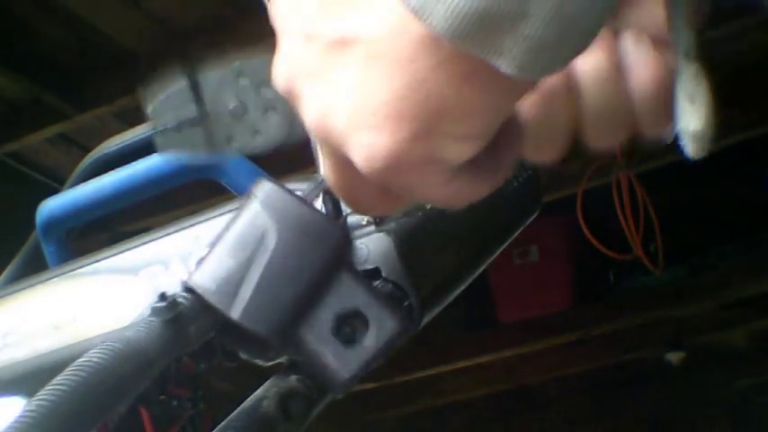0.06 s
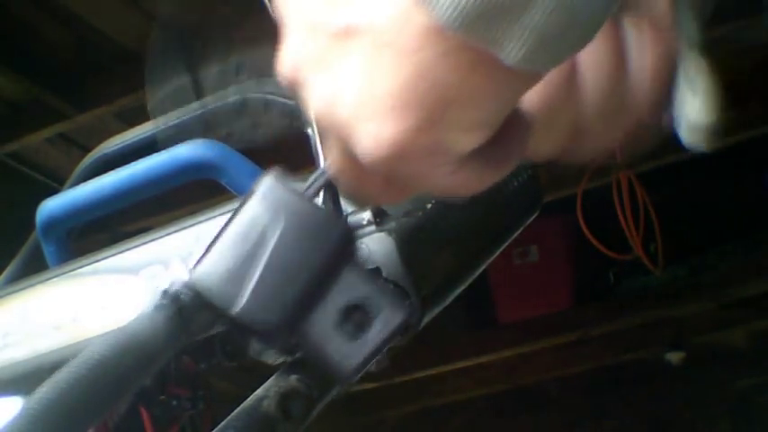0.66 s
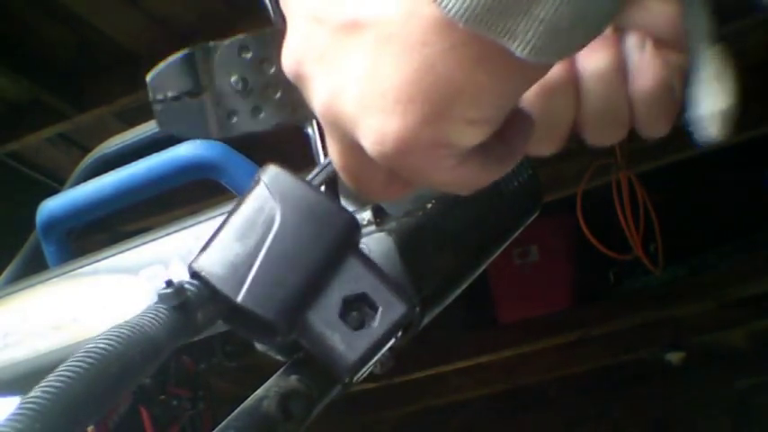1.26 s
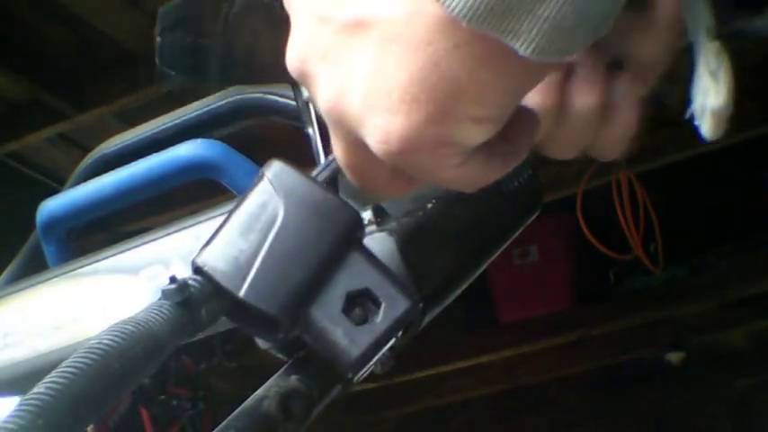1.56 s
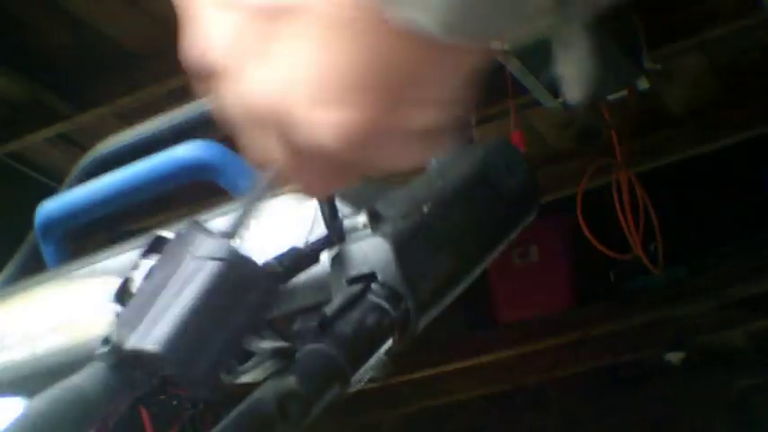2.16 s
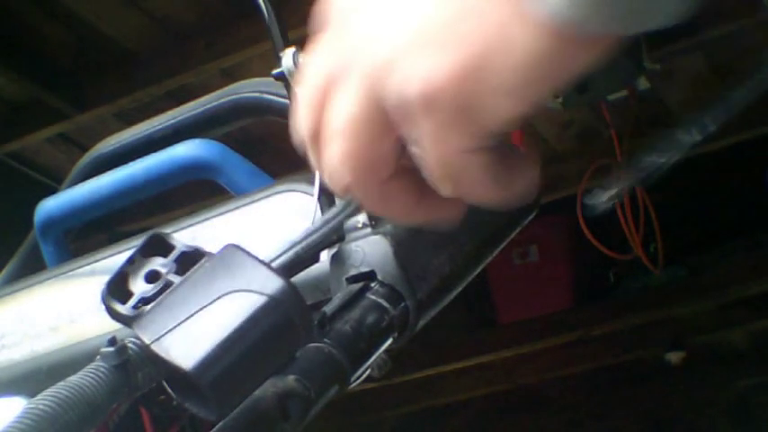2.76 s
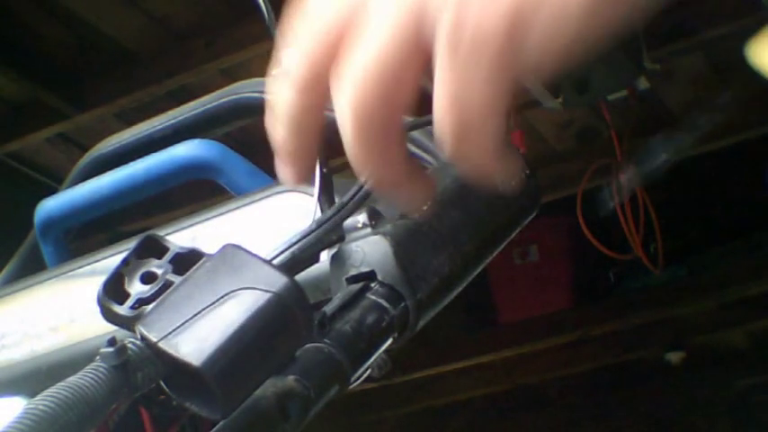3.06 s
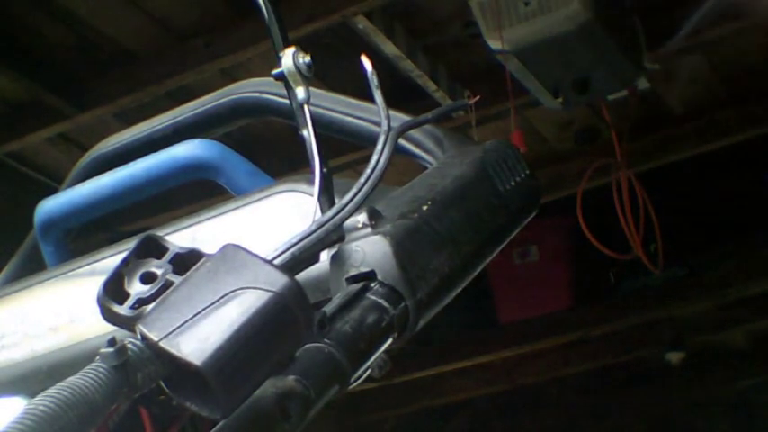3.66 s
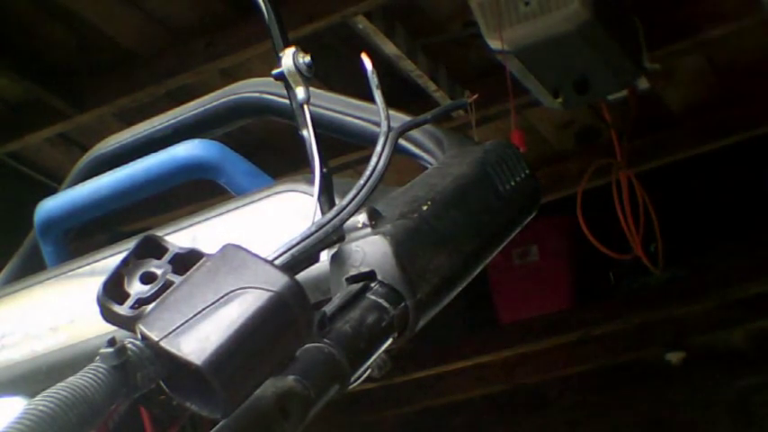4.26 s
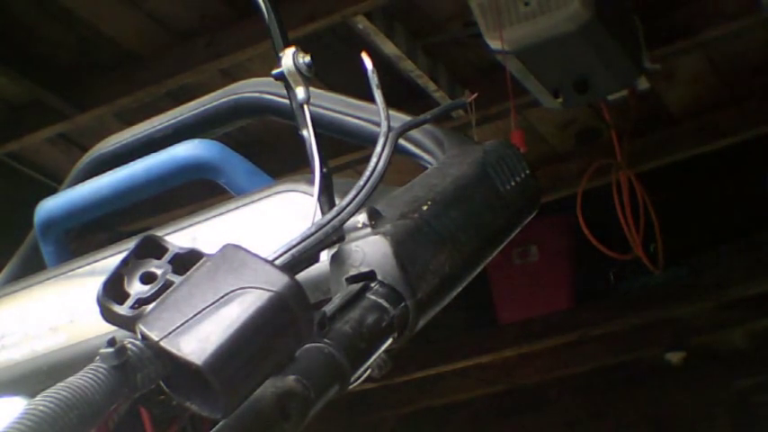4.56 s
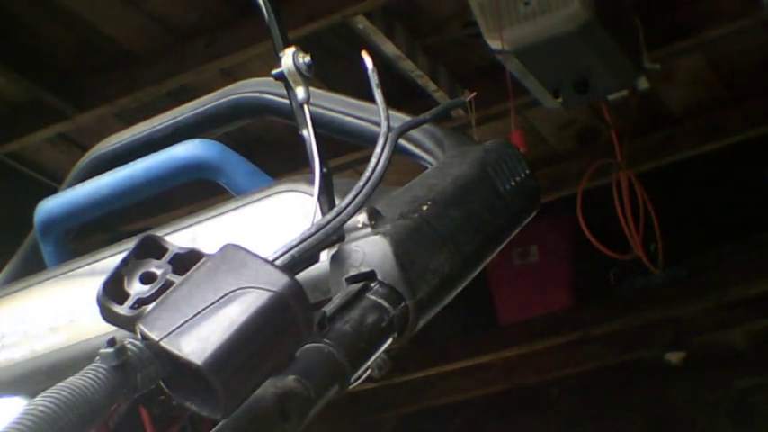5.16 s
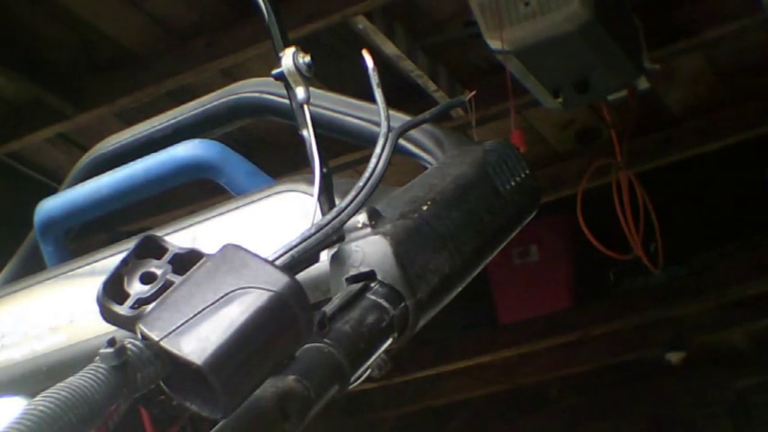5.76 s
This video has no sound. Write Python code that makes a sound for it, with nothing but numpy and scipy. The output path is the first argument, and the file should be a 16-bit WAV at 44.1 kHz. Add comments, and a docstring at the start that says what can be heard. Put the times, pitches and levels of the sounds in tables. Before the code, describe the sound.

Over a faint motor hum, a short metallic clunk and rattle on a handlebar, light rustling, then a tool set down with a thud.

```python
"""A garage, close on a machine's steel handlebar during wiring work. A crimping tool lets go with a clank,
the switch housing rattles against the tube and a loose steel part bounces twice. Fingers tick on wires,
bar and wires faintly creak, squeak and scrape, and a sleeve rustles. The tool goes down on the bench with
a clatter and a thud; a small soft knock comes last. Underneath sit low room air and a far motor's hum,
all through a small camera's dull, faintly ticking microphone."""
import sys
import numpy as np
from scipy import signal
from scipy.fft import rfft, irfft
from scipy.io import wavfile
from scipy.ndimage import uniform_filter1d

SR = 44100
rng = np.random.default_rng(int(sys.argv[2]) if len(sys.argv) > 2 else 0)


def waveform_to_disk(signal):
    """Save audio, clipped to [-1, 1], as 16-bit WAV at the path in sys.argv[1]."""
    frames = np.transpose(np.atleast_2d(signal))
    scaled = np.clip(frames, -1, 1) * 32767
    samples = np.round(scaled).astype(np.int16)
    wavfile.write(sys.argv[1], SR, samples)


N = 265129
T = np.arange(N) / SR

# clanks on the handlebar, knocks of the tool on the bench: (time [s], level [dB], hardness [0-1])
BAR_HITS = [(1.730, -40.5, 1), (1.742, -25.5, 0.24), (1.771, -14.5, 0.97), (1.798, -19, .3),
            (1.819, -21, 0.5), (1.886, -19, 0.8), (1.893, -18, 0.27), (2.030, -33.5, 0.08),
            (2.080, -36.5, 0.48), (2.110, -36, 0)]
BENCH_HITS = [(4.852, -26.5, 0.94), (4.927, -28, 0.81), (4.955, -35, .15), (4.988, -29, 1),
              (5.015, -29.5, 0), (5.086, -19, 0), (5.103, -21.5, 0.63), (5.164, -27, 0.5),
              (5.186, -24.5, 0.91), (5.212, -32, 0), (5.234, -29.5, 0.91), (5.259, -35.5, 0.6)]
# the clear ringing modes of each body: (frequency [Hz], relative level [dB], t60 [s])
BAR_MODES = [(129.5, -6.5, 0.46), (144.5, -10.5, 0.66), (183, 1.5, 0.11), (218.6, 1.5, 0.23),
             (263.8, -9, 0.83), (392.6, -1.5, 0.4), (482, -28.5, 4.4), (495, -7.5, 0.073),
             (517, -25.5, 2.57), (656, -7.5, 0.59), (787, -4, 0.28), (838, 6.5, 0.074), (1000, -21, 0.43),
             (1224, -19, 0.2), (1730, -6, 0.14), (1836, -23, 1.5), (1940, -16, 0.21), (2270, -10.5, .16),
             (2930, -30, 0.19), (3350, -36, 0.4), (3350, -21, 0.32)]
BENCH_MODES = [(188.2, -7.5, 0.25), (229, -1.5, 0.13), (304.8, -2, 0.22), (341, 1, 0.14),
               (456.5, -1.5, 0.15), (507, -8.5, 0.18), (600, -3, 0.089), (687, -12, 0.065),
               (1083, -12.5, 0.15), (1524, -24, 0.15), (1980, -18, 0.11), (2420, -16, 0.052),
               (3365, -22.5, 0.074)]
# colour of each body's dense modes and rattle: (frequency [Hz], relative level [dB])
BAR_RATTLE = [(60, -51), (120, -4), (250, -1.5), (330, -2), (600, -2), (880, -3), (1100, -12), (2300, -14),
              (3400, -23), (4200, -39.5), (5200, -38.5), (7500, -34.5)]
BENCH_RATTLE = [(100, -29), (190, 6), (330, -1), (400, 0.5), (540, 0.5), (760, -4.5), (1080, -9),
                (1600, -18.5), (2500, -25.5), (3400, -30), (4200, -45), (5200, -52.5), (7000, -48)]
# colour of the steel contact's snap on each body: (frequency [Hz], relative level [dB])
BAR_SNAP = [(500, -27), (900, 0.5), (1500, 1.5), (2000, -1), (2350, 0), (2800, -3.5), (3400, -9.5),
            (4200, -25), (5200, -31.5), (7000, -23)]
BENCH_SNAP = [(500, 11.5), (750, -17), (1050, -9), (1600, -27), (2000, 4.5), (2250, 1.5), (2550, 6),
              (2950, -17.5), (3450, -12), (4000, -33), (5200, -34), (6800, -26.5)]
# a harder contact is quicker, brighter, snappier and rattles less: (softest, hardest)
# for rise_s [s], tilt_db_per_octave [dB/octave], snap_db [dB] and rattle_t60 [s]
BAR_CONTACT = dict(rise_s=(0.0028, .0016), tilt_db_per_octave=(-4.5, 2), snap_db=(-16.5, -1),
               rattle_t60=(0.35, 0.14))
BENCH_CONTACT = dict(rise_s=(0.0024, 0.0017), tilt_db_per_octave=(0.93, 0.96), snap_db=(-25.5, 2),
                 rattle_t60=(0.21, 0.15))
# the surface giving under a hit: (time [s], frequency [Hz], level [dB])
THUDS = [(1.904, 253, -16), (4.854, 553, -22.5), (5.085, 274, -7)]
# bounces of the loose steel part: (time [s], level [dB])
CLINKS = [(2.02, -37.5), (2.080, -37)]
# its bright ring: (frequency [Hz], relative level [dB], t60 [s])
CLINK_MODES = [(1760, 2, 0.071), (2490, -7, 0.077), (2800, -17, .05), (3430, -6, 0.048), (3990, -9, 0.033)]
# finger ticks on wires and fittings, and one tick of the tool being handled: (time [s], frequency [Hz], level
# [dB], t60 [s])
TOUCHES = [(2.838, 1797, -59, 0.064), (2.888, 574, -39, 0.036), (3.392, 4530, -67, .04),
           (4.060, 453, -43, 0.049), (4.087, 2200, -44, .03)]
# sleeve swishes and a small soft knock at the end:
# (peak time [s], half length [s], level [dB], tilt [dB/octave])
SOFT_BURSTS = [(3.732, 0.049, -57, -1.5), (4.072, 0.0078, -47, -3.5), (4.092, 0.01, -53.5, 3),
               (4.609, 0.084, -59, 0), (5.998, 0.005, -52.5, -0.5)]
# their colour: (frequency [Hz], relative level [dB])
BURST_COLOUR = [(150, -8.5), (400, 1), (1000, -0.5), (1600, -5.5), (2600, -8), (3600, -17.5), (5000, -29.5),
                (7300, -21)]
# faint creaks, squeaks and scrapes from handlebar and wires: (peak time [s], frequency [Hz], level [dB])
CREAKS = [(.48, 3330, -75.5), (3.04, 2880, -74), (3.57, 3270, -74), (3.72, 1060, -62), (3.78, 2040, -67)]
# the far motor's shaft: (time [s], speed [turns/s])
MOTOR_SPEED = [(0, 42.8), (1.1, 44.5), (4.4, 44.3), (5.4, 42.4), (6, 42.8)]
# swell of its main tone, the third harmonic: (time [s], level [dB])
HUM_LEVEL = [(0, -50.5), (.6, -54.5), (3.5, -57), (3.9, -51.5), (4.35, -57), (4.7, -43.5), (5.0, -53),
             (5.7, -47), (6, -50.5)]
# colour of the room air: (frequency [Hz], relative level [dB])
AIR_COLOUR = [(20, 1), (31, -5), (41, -1), (66, -8.5), (90, -5.5), (135, -10.5), (170, -15), (240, -20),
              (520, -27.5), (880, -26.5), (1100, -35.5), (2100, -37), (3300, -44), (4100, -58),
              (5200, -62.5), (7400, -54)]


def struck_body(hits, modes, rattle_colour, snap_colour, contact, ring_db, rattle_db, snap_t60):
    """Each hit snaps at the steel contact, then rings the body's clear modes and a dense rattle."""
    out, t = np.zeros(N), T[:2 ** 16]
    hz, db, t60 = np.transpose(modes)
    for start, level_db, hardness in hits:
        hit = {name: np.interp(hardness, (0, 1), ends) for name, ends in contact.items()}
        tilt = hit["tilt_db_per_octave"]
        # the point of contact sets each mode's sign and loads it slightly out of tune
        weights = undb(db + tilt * np.log2(hz)) * rng.choice([-1, 1], len(hz))
        detuned_hz = hz + rng.standard_normal(len(hz)) * 1.09 / t60
        partials = np.sin(2 * np.pi * detuned_hz[:, None] * t) * fade(t, t60[:, None])
        ring = undb(ring_db) * (weights @ partials) / np.linalg.norm(weights)
        rattle = undb(rattle_db) * noise(rattle_colour, len(t), tilt) * fade(t, hit["rattle_t60"])
        snap = undb(hit["snap_db"]) * noise(snap_colour, len(t)) * fade(t, snap_t60)
        add(out, start, undb(level_db) * attack(t, hit["rise_s"]) * (ring + rattle + snap))
    return out


def thuds(swell_s):
    """Weight lands behind a hit: a few heavily damped swings of the surface."""
    out, t = np.zeros(N), T[:2 ** 13]
    push = (t / swell_s) ** 2 * np.exp(2 - 2 * t / swell_s)
    for start, hz, level_db in THUDS:
        add(out, start, undb(level_db) * push * np.sin(2 * np.pi * hz * t))
    return out


def clinks(rise_s, snap_db):
    """A small steel part chatters on each bounce and rings its few high modes."""
    out, t = np.zeros(N), T[:2 ** 13]
    for start, level_db in CLINKS:
        ring = sum(undb(db) * np.sin(2 * np.pi * (hz * t + rng.random())) * fade(t, t60)
                   for hz, db, t60 in CLINK_MODES)
        snap = undb(snap_db) * noise(BAR_SNAP, len(t), tilt=2.3) * fade(t, t60=0.041)
        add(out, start, undb(level_db) * (ring + snap) * attack(t, rise_s))
    return out


def touches(width):
    """Fingers flick a wire or a fitting, or the tool is handled: one dull tick each."""
    out, t = np.zeros(N), T[:2 ** 13]
    for start, hz, level_db, t60 in TOUCHES:
        envelope = attack(t, rise_s=0.00096) * fade(t, t60)
        add(out, start, undb(level_db) * envelope * resonant_noise(hz, width, len(t)))
    return out


def handling(grain_db, creak_width_hz, creak_half_s):
    """Grainy swells of noise: sleeve swishes, a soft knock, and creaks from handlebar and wires."""
    out, t = np.zeros(N), T[:2 ** 15]
    middle = t[-1] / 2
    swell = lambda half_s: np.exp(-0.5 * ((t - middle) / half_s) ** 2)
    for peak, half_s, level_db, tilt in SOFT_BURSTS:
        burst = noise(BURST_COLOUR, len(t), tilt)
        add(out, peak - middle, undb(level_db) * swell(half_s) * burst)
    for peak, hz, level_db in CREAKS:
        creak = resonant_noise(hz, creak_width_hz / hz, len(t))
        add(out, peak - middle, undb(level_db) * swell(creak_half_s) * creak)
    return out * undb(grain_db * drift(250))


def garage(x, t60, wet_db, crossover_hz, treble_life):
    """A cluttered wooden room: a diffuse tail whose treble dies first."""
    t = T[:SR]
    wash = rng.standard_normal(len(t))
    lows = butterworth(wash, "low", crossover_hz, order=1)
    tail = lows * fade(t, t60) + (wash - lows) * fade(t, t60 * treble_life)
    tail *= attack(t, rise_s=0.0048)
    return x + undb(wet_db) * signal.fftconvolve(x, tail / np.linalg.norm(tail))[:N]


def motor_hum(waver_db, second_db):
    """A far motor: the third harmonic of its shaft wavers over a weaker second."""
    speed = np.interp(T, *np.transpose(MOTOR_SPEED)) * (1 + 0.007 * drift(11))
    angle = 2 * np.pi * np.cumsum(speed) / SR
    third = undb(np.interp(T, *np.transpose(HUM_LEVEL)) + waver_db * drift(12)) * np.sin(3 * angle)
    second = undb(second_db + waver_db * drift(6)) * np.sin(2 * angle)
    return np.sqrt(2) * (third + second)


def room_air(level_db, waver_db):
    """A bed of dark noise whose level breathes gently."""
    return noise(AIR_COLOUR, N) * undb(level_db + waver_db * drift(5.676))


def noise(colour, size, tilt=0):
    """Noise of rms 1 with a (frequency [Hz], level [dB]) colour, tilted in dB per octave."""
    hz, db = np.transpose(colour)
    octave = np.log2(np.maximum(np.fft.rfftfreq(size, 1 / SR), 1))
    shape_db = np.interp(octave, np.log2(hz), db)
    shape_db += tilt * np.clip(octave, np.log2(hz[0]), np.log2(hz[-1]))
    return unit(irfft(rfft(rng.standard_normal(size)) * undb(shape_db), size))


def resonant_noise(hz, width, size):
    """Noise of rms 1 in one resonance; width is a share of its frequency."""
    b, a = signal.iirpeak(hz, 1 / width, fs=SR)
    return unit(signal.lfilter(b, a, signal.lfilter(b, a, rng.standard_normal(size))))


def drift(rate_hz):
    """A random modulator of rms 1: sample and hold, smoothed twice."""
    hold = int(SR / rate_hz)
    steps = np.repeat(rng.standard_normal(N // hold + 1), hold)
    return unit(uniform_filter1d(uniform_filter1d(steps, hold), hold)[:N])


def butterworth(x, kind, hz, order):
    """Low-pass or high-pass filter."""
    return signal.sosfilt(signal.butter(order, hz, kind, fs=SR, output="sos"), x)


def attack(t, rise_s):
    """Onset that eases up to full level."""
    return 1 - np.exp(-t / rise_s)


def fade(t, t60):
    """Exponential decay, 60 dB down at t60."""
    return np.exp(-np.log(1000) * t / t60)


def undb(db):
    """Decibels to gain."""
    return 10 ** (np.asarray(db) / 20)


def unit(x):
    """Scale to rms 1."""
    return x / np.sqrt(np.mean(x ** 2))


def add(out, start_s, x):
    """Mix x into out from start_s."""
    i = int(start_s * SR)
    out[i:i + len(x)] += x[:N - i]


def scene():
    """Tool and hands up front in the garage, over a bed of air and hum."""
    bar = struck_body(BAR_HITS, BAR_MODES, BAR_RATTLE, BAR_SNAP, BAR_CONTACT,
                      ring_db=-2.5, rattle_db=-0.5, snap_t60=0.076)
    bench = struck_body(BENCH_HITS, BENCH_MODES, BENCH_RATTLE, BENCH_SNAP, BENCH_CONTACT,
                        ring_db=1.0, rattle_db=-1.5, snap_t60=0.064)
    # the hits keep little below the bodies' lowest modes
    bar = butterworth(bar, "high", hz=109, order=4)
    bench = butterworth(bench, "high", hz=152, order=4)
    impacts = bar + bench + thuds(swell_s=0.003)
    foley = touches(width=0.39) + handling(grain_db=3.0, creak_width_hz=340, creak_half_s=0.035)
    work = garage(impacts + foley, t60=0.43, wet_db=-7, crossover_hz=2000, treble_life=0.7)
    # the loose part lies close to the microphone, so it stays dry
    loose_part = clinks(rise_s=0.0011, snap_db=-1)
    bed = room_air(level_db=-46, waver_db=1.1) + motor_hum(waver_db=2, second_db=-58)
    return (work + loose_part + bed)[None]


def record(dry):
    """A dull microphone with faint hiss; one sample sags and jumps between the camera's audio blocks."""
    microphone_hz, top_hz = 7700, 16200
    first_seam_s, block_s = 0.0049, 0.066755
    x = signal.sosfilt(signal.ellip(8, 0.2, 70, microphone_hz, fs=SR, output="sos"), dry)
    seams = (np.arange(first_seam_s, T[-1], block_s) * SR).astype(int)
    x[:, seams] = 0.4 * x[:, seams] + undb(-53.5) * rng.laplace(size=len(seams))
    hiss = undb(-94) * rng.standard_normal(N)
    return signal.sosfilt(signal.ellip(8, 0.2, 70, top_hz, fs=SR, output="sos"), x + hiss)


dry = scene()
out = record(dry)
waveform_to_disk(out)
```